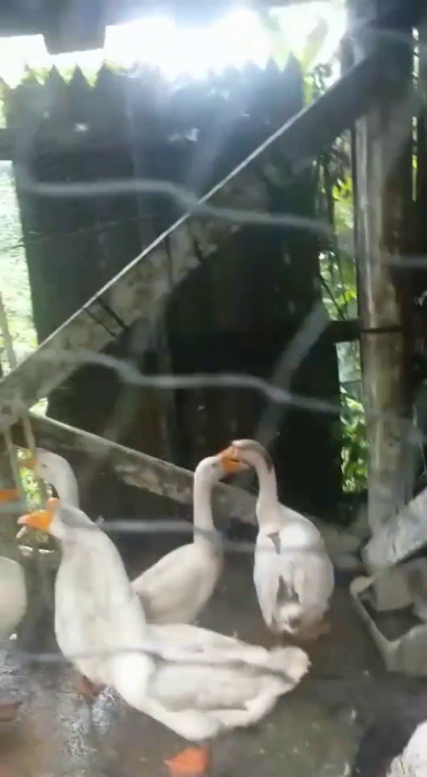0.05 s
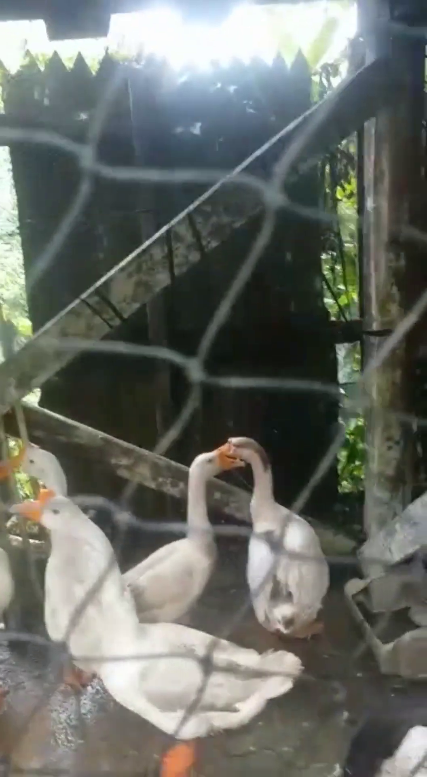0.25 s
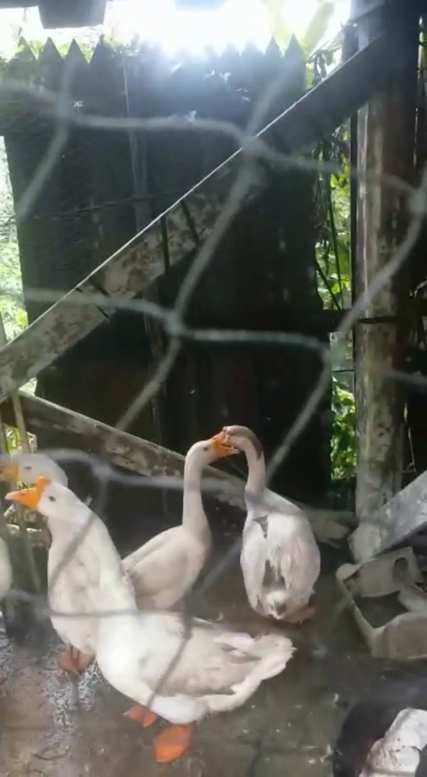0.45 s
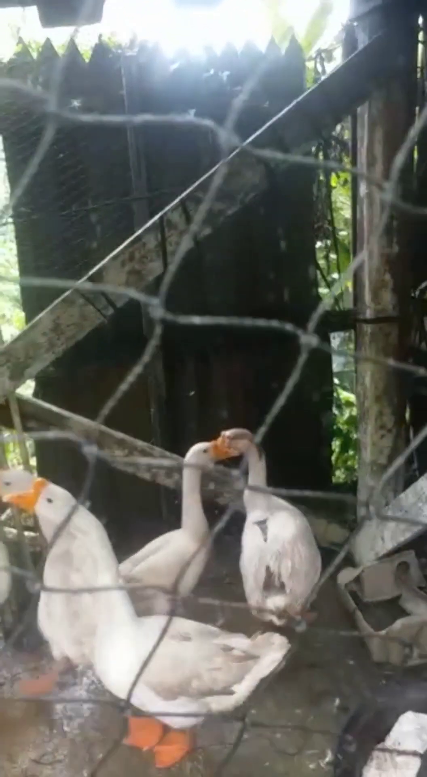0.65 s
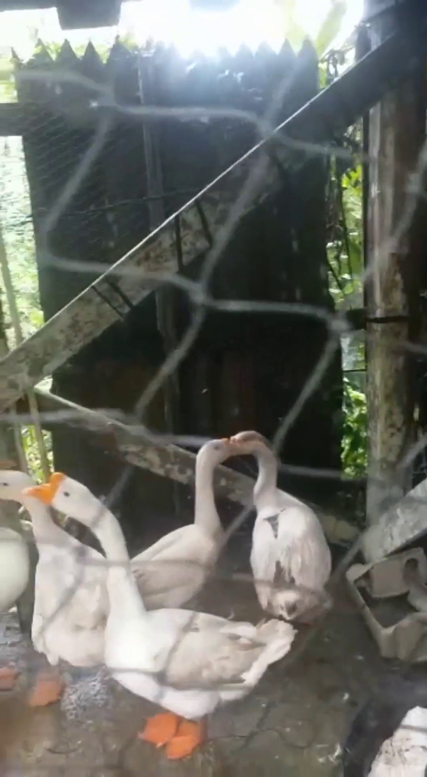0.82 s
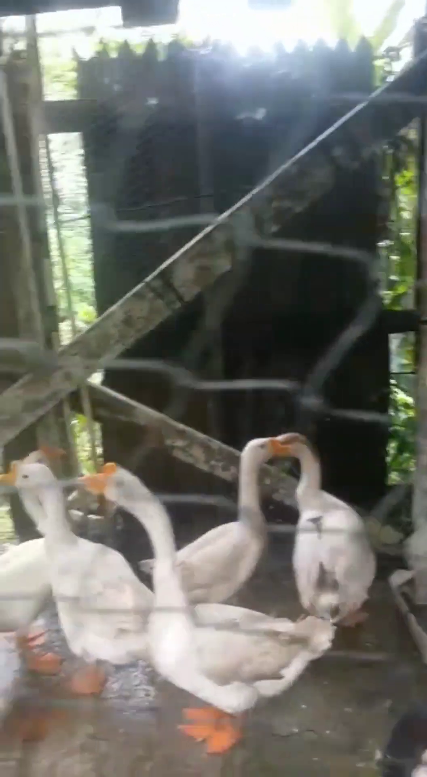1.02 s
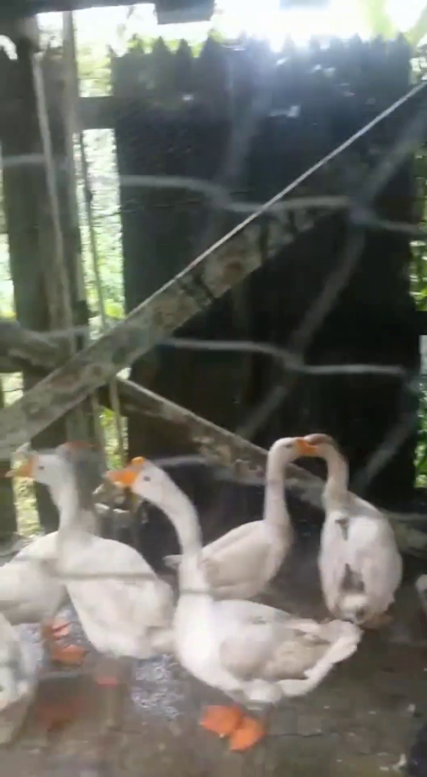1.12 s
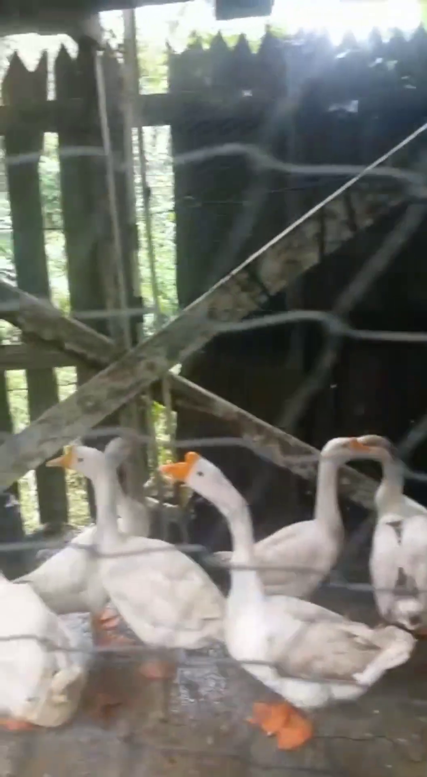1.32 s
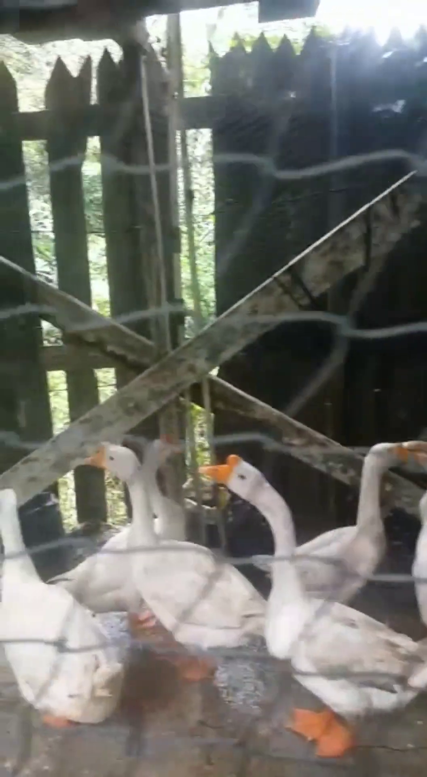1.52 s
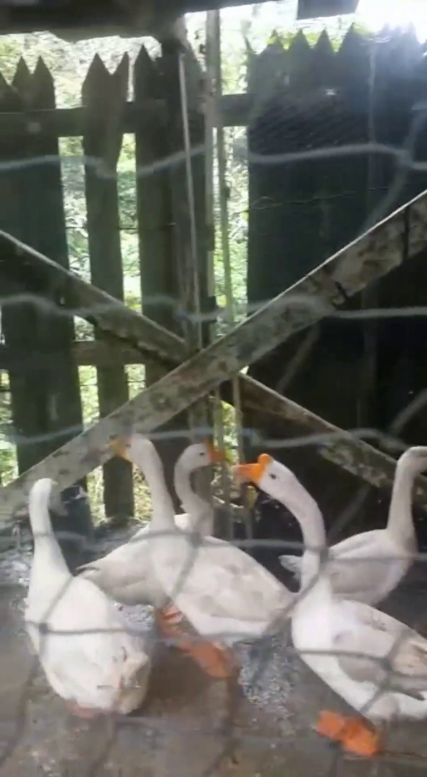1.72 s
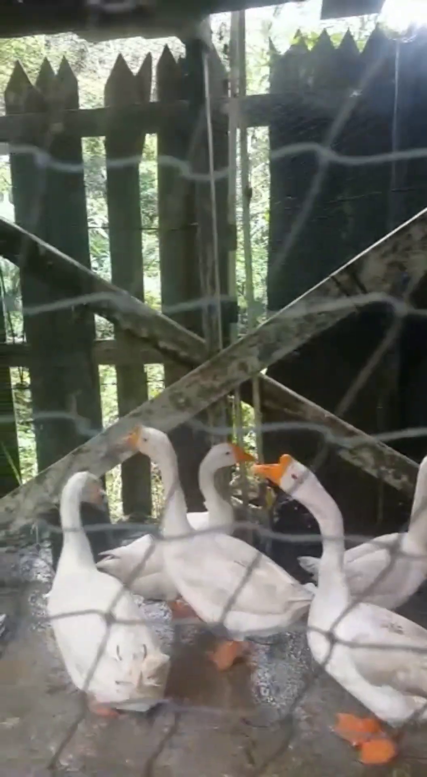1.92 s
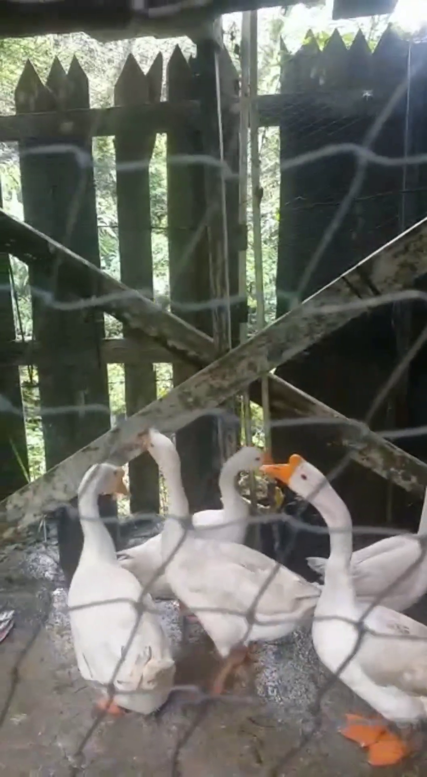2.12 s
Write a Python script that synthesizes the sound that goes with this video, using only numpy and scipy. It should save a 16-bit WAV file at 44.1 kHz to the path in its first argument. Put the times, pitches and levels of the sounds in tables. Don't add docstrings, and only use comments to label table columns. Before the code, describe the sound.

Goose honks in a wooden pen. The ring of an earlier honk fades at 0 s, with a tiny far bird peep near 0.1. At 0.2 a squeak breaks into a loud, high nasal honk, strongest until 0.47, then fluttering weaker to 0.85. A low, rough, quieter honk answers from 1.4 to 1.95. Sharp clicks and scrapes follow from 2.0. Cicadas and yard air continue throughout.

```python
import sys
import numpy as np
from scipy import signal
from scipy.io import wavfile
from scipy.ndimage import uniform_filter1d

SR = 44100
rng = np.random.default_rng(int(sys.argv[2]) if len(sys.argv) > 2 else 0)


def decibels_to_gain(level_db):
    exponent = np.asarray(level_db, float) / 20
    return 10 ** exponent


def dump_mix(stems):
    frames = np.atleast_2d(stems).T
    limited = np.clip(frames, -1, 1)
    pcm = np.round(limited * 32767).astype(np.int16)
    wavfile.write(sys.argv[1], SR, pcm)


N = 94815


def evened(x):
    return x / np.sqrt(np.mean(x ** 2) + 1e-20)


def read(points, hz):
    f, value = np.transpose(points)
    return np.interp(np.log(hz + 1), np.log(f + 1), value)


def follow(points, t):
    return np.interp(t, *np.transpose(points))


def columns(rows):
    rows = np.transpose(rows)
    t = np.arange(rows[0, 0], rows[0, -1], 1 / SR)
    return round(rows[0, 0] * SR), t, [np.interp(t, rows[0], c) for c in rows[1:]]


def add(mix, at, sound):
    part = mix[at:][:len(sound)]
    part += sound[:len(part)]


def drift(count, hz):
    width = max(int(SR / hz / 2), 1)
    once = uniform_filter1d(rng.standard_normal(count), width)
    return evened(uniform_filter1d(once, width))


def cycles(hz):
    return np.cumsum(hz) / SR


def resonate(x, hz, width):
    turn = np.exp(2j * np.pi * cycles(hz * np.ones(len(x))))
    r = np.exp(-np.pi * width / SR)
    smooth = signal.lfilter([(1 - r) ** 2], [1, -2 * r, r * r], x / turn + 1e-18)
    return 2 * (turn * smooth).real


def edges(t, rise_s):
    return np.clip(np.minimum(t - t[0], t[-1] - t) / rise_s, 0, 1)


# start_s, pitch_hz, level_db, beak_db (share of third overtone), flutter_db
HIGH_PATH = [(0.248, 707.4, -40.5, -10, 4.5), (0.278, 716.2, -23, -8.5, -5),
             (0.3, 723.8, -21, -2.5, -15), (0.325, 717.4, -24.5, -6, -50),
             (0.34, 715.1, -23.5, -24, -51), (0.372, 722.7, -21, -6, -42),
             (0.387, 724.7, -24, -1.5, -28), (0.4, 731.8, -19, -6.5, -38),
             (0.455, 729.5, -21, -21.5, -22),
             (0.47, 727.7, -23, -7, -17.5), (0.488, 712.5, -31, -3, 1.5),
                      (0.502, 728.2, -27, -5, -8), (0.584, 723.8, -28, -4, -3),
                      (0.666, 721, -24.5, -1.5, -12), (0.706, 727.5, -29, -4, -1.5),
                      (0.73, 717, -32.5, -13.5, 3.5), (0.748, 720, -27, -9, -2),
                      (0.764, 710, -27.5, -56, -14), (0.786, 714.3, -38, -0.5, 5),
                      (0.815, 683, -35, -20, -17), (0.85, 719.4, -54, -17, -18),
                      (0.95, 704.5, -65, -20, -30)]
# multiple, level_db, below_db, above_db, second_pair_db
HIGH_OVERTONES = [(1, -7.5, -22, -1.5, -20.5), (2, -2, -6.5, -7, -30), (3, 2, -13, -8.5, -21),
                  (4, -15.5, 3.5, -0.5, -8), (5, -30.5, 5.5, 7, -26.5), (6, -36, -13.5, -9.5, 3),
                  (7, -34, 2, 7.5, -8), (8, -41, -15, -19, -23)]
# start_s, rate_hz
MEMBRANE_FLUTTER = [(.25, 120.5), (.62, 124.9), (.7, 133.5), (.86, 125)]
# start_s, fundamental_db, fourth_overtone_db
THROAT_SHAPE = [(.25, 3.5, -15), (.3, -4, 4), (.33, 0, 11), (0.374, -1, 4.5), (.41, -3, -7), (.47, -1.5, 1),
                (.53, 4.5, 0), (.6, 3, -21), (.667, -8.5, -3.5), (.73, 1, 2), (0.821, -1.5, 2.5),
                (.9, -5, -20)]
# centre_hz, width_hz, level_db
HONK_BREATH = [(1070, 130, -41), (2410, 1060, -24), (4500, 3100, -37.5)]
HIGH_WOBBLE, HIGH_RASP_DB, HIGH_RASP_HZ = 0.0025, -31, 280
UPPER_DB, PATCHY_DB = -1, 2
FLUTTER_DULL_DB, FAR_BELOW_DB, SIDE_WAVER_DB = -3.5, -0.5, 1.5


def high_honk():
    at, t, (hz, db, beak_db, flutter_db) = columns(np.array(HIGH_PATH))
    count = len(t)
    phase = 2 * np.pi * cycles(hz * (1 + HIGH_WOBBLE * drift(count, 40)))
    slow = 2 * np.pi * cycles(follow(MEMBRANE_FLUTTER, t))
    third_share = np.clip(decibels_to_gain(beak_db), 0, .97)
    when, first_db, fourth_db = np.transpose(THROAT_SHAPE)
    throat_db = {1: np.interp(t, when, first_db), 4: np.interp(t, when, fourth_db)}
    out = np.zeros(count)
    for f, width, breath_db in HONK_BREATH:
        out += decibels_to_gain(breath_db) * evened(resonate(rng.standard_normal(count), f, width))
    for k, tone_db, below_db, above_db, far_db in HIGH_OVERTONES:
        a, b, c, d, e = k * phase + 2 * np.pi * rng.random((5, 1))
        near = decibels_to_gain(below_db) * np.cos(b - slow) + decibels_to_gain(above_db) * np.cos(c + slow)
        far = decibels_to_gain(FAR_BELOW_DB) * np.cos(d - 2 * slow) + np.cos(e + 2 * slow)
        sides = near + decibels_to_gain(far_db) * far
        rasp = np.cos(a) * drift(count, HIGH_RASP_HZ) + np.sin(a) * drift(count, HIGH_RASP_HZ)
        if k == 2:
            beak = np.sqrt(1 - third_share ** 2)
        elif k == 3:
            beak = third_share
        else:
            upper_db = (k > 4) * (UPPER_DB + PATCHY_DB * drift(count, 18.6))
            dull_db = (k > 3) * FLUTTER_DULL_DB * decibels_to_gain(flutter_db)
            beak = decibels_to_gain(upper_db + dull_db)
        side_level = decibels_to_gain(flutter_db + SIDE_WAVER_DB * drift(count, 16))
        tone = decibels_to_gain(throat_db.get(k, 0)) * np.cos(a)
        out += decibels_to_gain(tone_db) * beak * (tone + side_level * sides + decibels_to_gain(HIGH_RASP_DB) * rasp)
    return at, np.sqrt(2) * decibels_to_gain(db) * edges(t, 0.0062) * out


# start_s, pitch_hz, level_db
SQUEAK_PATH = [
    (.19, 819, -69),
    (.203, 825.4, -35.5),
    (.215, 849, -32.5),
    (.228, 880, -32.5),
    (.238, 977, -34),
    (.25, 954, -37),
    (.256, 826, -28.5),
    (.285, 795, -44.5),
    (.315, 767, -61),
]
# multiple, level_db
SQUEAK_OVERTONES = [(1, -11), (2, -5.5), (3, -15), (4, -28)]
SQUEAK_ROUGH, SQUEAK_HISS_DB = 0.32, -12
SQUEAK_OPEN_S, SQUEAK_SHUT_DB = 0.224, -25


def squeak():
    at, t, (hz, db) = columns(SQUEAK_PATH)
    count = len(t)
    shut_db = SQUEAK_SHUT_DB * np.clip((SQUEAK_OPEN_S - t) / 0.051, 0, 1)
    turns = cycles(hz * (1 + 0.005 * drift(count, 120)))
    tone = np.zeros(count)
    for k, tone_db in SQUEAK_OVERTONES:
        level = decibels_to_gain(tone_db + (k != 2) * shut_db)
        tone += level * np.cos(2 * np.pi * k * turns) * (1 + SQUEAK_ROUGH * drift(count, 300))
    hiss = evened(resonate(rng.standard_normal(count), 2580, 1400))
    return at, decibels_to_gain(db) * edges(t, 0.0023) * (evened(tone) + decibels_to_gain(SQUEAK_HISS_DB + shut_db) * hiss)


# start_s, pitch_hz, level_db
WHEEZE_PATH = [
    (.14, 476, -78),
    (.165, 474, -64),
    (.19, 470, -61),
    (.21, 465, -70),
]


def wheeze():
    at, t, (hz, db) = columns(WHEEZE_PATH)
    turns = cycles(hz * (1 + .004 * drift(len(t), 60)))
    tone = np.zeros(len(t))
    for k in range(2, 7):
        tone += np.cos(2 * np.pi * (k * turns + rng.random())) * decibels_to_gain(3 * drift(len(t), 30))
    return at, decibels_to_gain(db) * tone


# start_s, pitch_hz, level_db, roughness (0-1)
LOW_PATH = [
    (1.405, 113.8, -51, 0.25),
    (1.443, 117.9, -30, 0.57),
    (1.463, 121.3, -40.5, 0.36),
    (1.513, 124.5, -36.5, 0.4),
    (1.567, 128.9, -32, 0),
    (1.65, 135, -32, 0),
    (1.713, 137.7, -31, 0.1),
    (1.835, 139.9, -29, 0.54),
    (1.923, 132.4, -45, 0.3),
    (1.96, 129, -81, 0.22),
]
# centre_hz, width_hz, level_db, neck_bent_db, beak_shut_db (changes when bent or shut)
WINDPIPE = [(880, 266, 3, 5, 5), (1145, 257, -0.5, -10, 7), (1616, 570, -13.5, 7.5, 7),
            (2011, 188, -11.5, -2, 14.5), (2355, 270, -11.5, 12.5, -3), (2910, 354, -13.5, -12.5, 12.5),
            (3840, 870, -20, -0.5, 2), (4720, 630, -25, -27, 3), (10100, 3700, -37.5, -0.5, 5)]
# multiple, level_db
CHEST_TONES = [(1, -24), (2, -23), (3, -23), (4, -25)]
# start_s, ring_hz, level_db
CORE_RING = [(1.425, 825, -50), (1.447, 830, -30), (1.465, 855, -39), (1.5, 870, -36), (1.535, 890, -47),
             (1.565, 912, -35), (1.635, 935, -36), (1.655, 812, -34), (1.7, 824, -37), (1.76, 830, -33),
             (1.79, 833, -34), (1.803, 834, -42), (1.82, 836, -33), (1.855, 837, -32), (1.875, 825, -40),
             (1.93, 810, -52)]
NECK_S, NECK_RISE_S, STRETCH = 1.494, 0.064, 0.14
GAPE_S, GAPE_RISE_S = 1.6, .15
LOW_JITTER, LOW_WANDER, WANDER_HZ, LOW_RASP = .012, .5, 24, .3
SPREAD, CORE_SPREAD = .16, .15
CHEST_FOLLOWS, CHEST_DB = .3, -18
NASAL_HZ, NASAL_WIDTH_HZ, NASAL_DB = 520, 28, 8
CORE_WIDTH_HZ = 110
UPPER_RING_HZ, UPPER_RING_WIDTH_HZ, UPPER_RING_DB = 1110, 300, -5


def bell(hz, centre, width):
    return np.exp(-((hz - centre) / width) ** 2)


def membrane_pulses(turns, rough):
    count, folds = len(turns), 0
    for k in range(5, 75):
        a = 2 * np.pi * (k * turns + SPREAD * rng.standard_normal())
        folds = folds + np.cos(a) * (1 + LOW_WANDER * drift(count, WANDER_HZ))
        folds = folds + np.sin(a) * LOW_WANDER * drift(count, WANDER_HZ)
    puffs = (1.2 + np.exp(-(turns % 1) / 1.7)) * rng.standard_normal(count)
    return (1 - rough) * evened(folds) + rough * evened(puffs)


def chest_tones(even, hz, bent):
    out = np.zeros(len(hz))
    for k, tone_db in CHEST_TONES:
        nasal_db = NASAL_DB * bell(k * hz, NASAL_HZ, NASAL_WIDTH_HZ)
        level_db = tone_db - 9 * bent * (k > 1) + 4 * drift(len(hz), 20) + nasal_db
        out += decibels_to_gain(level_db) * np.cos(2 * np.pi * (k * even + rng.random()))
    return out


def core_tones(even, hz, ring_hz):
    out = np.zeros(len(hz))
    for k in range(5, 11):
        core = bell(k * hz, ring_hz, CORE_WIDTH_HZ / 2)
        upper = bell(k * hz, UPPER_RING_HZ, UPPER_RING_WIDTH_HZ / 2)
        level = core + decibels_to_gain(UPPER_RING_DB + 3.6 * drift(len(hz), 23)) * upper
        out += level * np.cos(2 * np.pi * (k * even + CORE_SPREAD * rng.random()))
    return out


def low_honk():
    at, t, (hz, db, rough) = columns(LOW_PATH)
    bent = np.clip(1 - (t - NECK_S) / NECK_RISE_S, 0, 1)
    shut = np.clip(1 - (t - GAPE_S) / GAPE_RISE_S, 0, 1)
    even = cycles(hz)
    turns = even + LOW_JITTER * drift(len(t), 70)
    drive = membrane_pulses(turns, np.clip(rough, LOW_RASP, 1))
    pipe = np.zeros(len(t))
    for k, (f, width, pipe_db, bent_db, shut_db) in enumerate(WINDPIPE):
        moved_hz = f * (1 - (k > 0) * STRETCH * bent)
        level = decibels_to_gain(pipe_db + bent_db * bent + shut_db * shut)
        pipe += (-1) ** k * level * resonate(drive, moved_hz, width)
    pipe = pipe / np.sqrt(uniform_filter1d(pipe ** 2, size=1500) + 1e-9)
    chest = decibels_to_gain(CHEST_FOLLOWS * db + CHEST_DB) * chest_tones(even, hz, bent)
    when, ring_hz, core_db = np.transpose(CORE_RING)
    core = core_tones(even, hz, np.interp(t, when, ring_hz))
    core = np.sqrt(2) * decibels_to_gain(np.interp(t, when, core_db)) * core
    return at, edges(t, 0.0043) * decibels_to_gain(db) * pipe, edges(t, 0.027) * (core + chest)


# pitch_hz, level_db, t60_s
DYING_HONK = [(1430, -44, .5), (1442, -50, .6), (2864, -53, .3), (1210, -47, .15), (1120, -52, .12)]


def earlier_honk():
    t, out = np.arange(N) / SR, np.zeros(N)
    for hz, db, t60 in DYING_HONK:
        level = decibels_to_gain(db - 60 * t / t60 + 1.5 * drift(N, 25))
        out += level * np.cos(2 * np.pi * (hz * t + .04 * drift(N, 25)))
    return np.minimum(t / .003, 1) * out


# start_s, peak_db, centre_hz, length_s
SCUFFS = [
    (0.253, -58.5, 10100, 0.017),
    (.7327, -43, 11000, 0.0072),
    (1.221, -40, 3300, 0.016),
    (1.567, -36.5, 7900, 0.0096),
          (1.995, -43, 8000, .012),
    (2.003, -39, 7300, .03),
    (2.008, -45, 3600, .04),
    (2.04, -50, 2600, .08),
    (2.122, -48, 3000, .04),
    (2.14, -46, 3800, .02),
]
# start_s, peak_db, centre_hz
SHARP_CLICKS = [
    (2.0203, -28, 7400),
    (2.0225, -35, 7600),
    (2.058, -34, 7900),
    (2.0605, -32, 7500),
    (2.1312, -46, 8500),
    (2.1445, -31, 7000),
]
CLICK_S = .0012
TICK_WIDE_DB, TICK_SHARP, TICK_TOP_HZ = -5, 5, 11500
BRIGHT_ABOVE_HZ = 5000


def ticks():
    out, t = np.zeros(N), np.arange(3000) / SR
    clicks = [(*click, CLICK_S) for click in SHARP_CLICKS]
    for s, db, hz, length in [*SCUFFS, *clicks]:
        shape = np.minimum(t / length * 6, 1) * np.exp(-t / length * 2)
        puff = rng.standard_normal(len(t)) * shape
        ring = resonate(puff, hz, hz / TICK_SHARP)
        wide = resonate(puff, TICK_TOP_HZ, TICK_TOP_HZ / 2)
        wide_level = decibels_to_gain(TICK_WIDE_DB - 12 * (hz < BRIGHT_ABOVE_HZ))
        knock = ring / abs(ring).max() + wide_level * wide / abs(wide).max()
        add(out, round(s * SR), decibels_to_gain(db) * knock)
    return out


# start_s, pitch_hz, level_db
PEEP = [
    (.055, 8200, -78),
    (.08, 7600, -51),
    (.1, 7840, -56.5),
    (.125, 7350, -82),
]


def bird():
    at, t, (hz, db) = columns(PEEP)
    return at, decibels_to_gain(db) * np.sin(2 * np.pi * cycles(hz))


# centre_hz, t60_s
PEN_DECAY = [(200, 0.32), (1400, 0.34), (3000, 0.34), (8000, 0.16)]
PEN_LOW_HZ = 450


def pen(x):
    taps = np.zeros(SR // 2)
    at = np.arange(200, len(taps) - 20, 20)
    taps[at + rng.integers(0, 20, len(at))] = rng.choice([-1., 1.], len(at))
    hz, t, z = signal.stft(taps, SR, nperseg=256)
    decay = decibels_to_gain(-60 * t / read(PEN_DECAY, hz)[:, None])
    tail = signal.istft(z * decay * (hz > PEN_LOW_HZ)[:, None], SR, nperseg=256)[1]
    return signal.fftconvolve(x, tail / np.linalg.norm(tail))[:N]


# centre_hz, width_hz, level_db
CICADA_BODIES = [(6334, 1320, 8.5), (7800, 1550, -5), (12740, 2820, -1.5), (15000, 2800, -14),
                 (11120, 1200, -25)]
CICADA_DB, BUZZ_HZ, BUZZ_DB = -48, 154, -1


def cicadas():
    clicks = rng.standard_normal(N) * decibels_to_gain(1.7 * np.minimum(rng.exponential(1, N), 4))
    turns = cycles(BUZZ_HZ * (1 + .1 * drift(N, 8.07)))
    buzz_db = BUZZ_DB * np.cos(2 * np.pi * turns) + 0.5 * drift(N, 30) + .5 * drift(N, 2.4)
    drive, out = clicks * decibels_to_gain(buzz_db), np.zeros(N)
    for hz, width, db in CICADA_BODIES:
        out += decibels_to_gain(db) * evened(resonate(resonate(drive, hz, width), hz, width))
    return decibels_to_gain(CICADA_DB) * evened(out)


# pitch_hz, level_db (per Hz)
YARD_COLOUR = [(15, -64), (25, -3.5), (256, 0), (358, -5.5), (705, -4), (1360, -8.5), (3270, -14.5),
               (4490, -16.5), (5500, -19), (7150, -59), (12100, -120)]
# start_s, level_db
YARD_SWELL = [
    (0, -4.5),
    (.2, -3),
    (.4, -0.5),
    (.9, -2),
    (1.4, -1.5),
    (1.95, 0),
    (2.15, 2.5),
]
AIR_DB, PATCH_DB = -54, 1


def air():
    frames, hz = N // 256 + 5, np.fft.rfftfreq(1024, 1 / SR)
    a, b, patches = rng.standard_normal((frames, 513, 3)).T
    patches = evened(uniform_filter1d(uniform_filter1d(patches, 10, 0), 12, 1))
    swell_db = follow(YARD_SWELL, (np.arange(frames) - 2) * 256 / SR)
    z = (a + 1j * b) * decibels_to_gain(read(YARD_COLOUR, hz)[:, None] + PATCH_DB * patches + swell_db)
    return decibels_to_gain(AIR_DB) * evened(signal.istft(z, nperseg=1024, noverlap=768)[1][:N])


PEN_DB, HIGH_PEN_DB, TICK_PEN_DB = -4, -11, -9


def scene():
    low, high, small = np.zeros(N), np.zeros(N), ticks()
    add(high, *high_honk())
    add(low, *squeak())
    add(low, *wheeze())
    at, rasp, clean = low_honk()
    add(low, at, rasp)
    add(high, at, clean)
    add(small, *bird())
    wet = pen(decibels_to_gain(PEN_DB) * low + decibels_to_gain(HIGH_PEN_DB) * high + decibels_to_gain(TICK_PEN_DB) * small)
    return (low + high + small + wet + earlier_honk() + air() + cicadas())[None]


MIC_LOW_HZ = 55


def band_limit(x):
    return signal.sosfilt(signal.butter(12, 15560, fs=SR, output="sos"), x)


def record(dry):
    bass_cut = signal.butter(N=4, Wn=MIC_LOW_HZ, btype="high", fs=SR, output="sos")
    mix = signal.sosfilt(bass_cut, dry)
    return band_limit(mix)


dry = scene()
out = record(dry)
dump_mix(out)
```